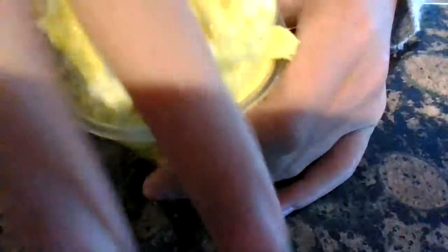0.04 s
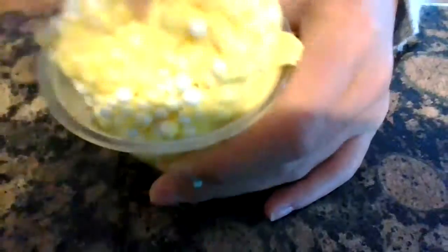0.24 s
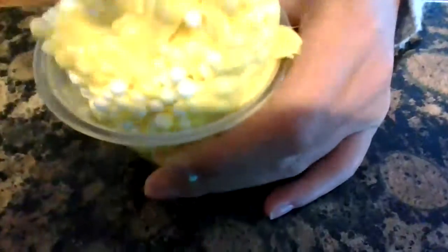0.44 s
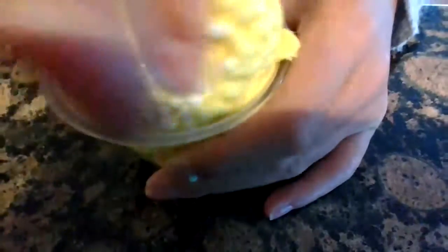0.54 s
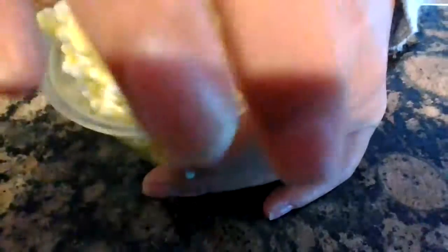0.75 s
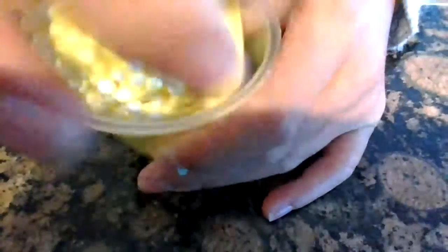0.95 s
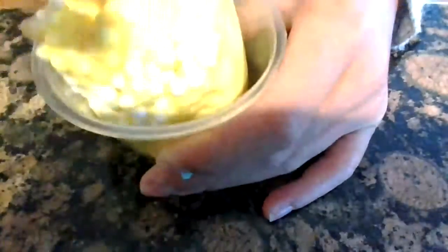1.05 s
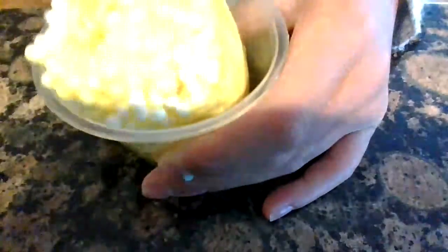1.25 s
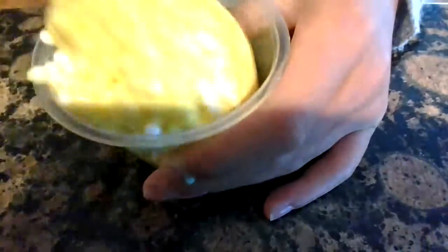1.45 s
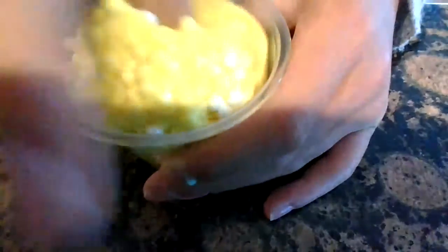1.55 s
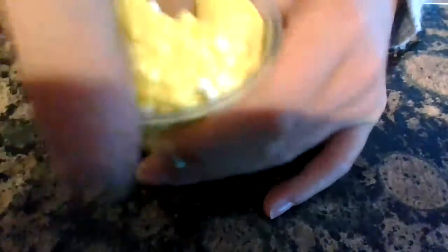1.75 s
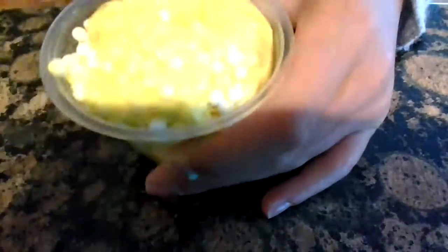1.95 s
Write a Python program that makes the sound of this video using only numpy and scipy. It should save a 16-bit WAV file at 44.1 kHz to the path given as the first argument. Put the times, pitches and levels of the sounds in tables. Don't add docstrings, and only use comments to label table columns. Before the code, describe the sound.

Foam-bead slime is squeezed in a plastic cup: soft wet fizz and bright ticks, then a sudden loud air-pocket pop that overloads the right side, followed by sparse crackles and duller pocks, close-miked in a quiet room.

```python
import sys
import numpy as np
from scipy import signal
from scipy.fft import rfft, irfft, next_fast_len
from scipy.io import wavfile
from scipy.ndimage import uniform_filter1d, map_coordinates

SR = 44100
rng = np.random.default_rng(int(sys.argv[2]) if len(sys.argv) > 2 else 0)


def inscribe(sig):
    pcm = np.round(np.clip(np.atleast_2d(sig).T, -1, 1) * 32767)
    wavfile.write(sys.argv[1], SR, pcm.astype(np.int16))


def to_linear_factor(level_db):
    exponent = np.asarray(level_db, float) / 20
    return 10 ** exponent


N = 88200

# (time [s], crack level [dB], cavity level [dB])
POCKET_TEARS = [
    (0.2467, 3.5, -3.5),
    (0.256, 3.5, -5.5),
]
# (time [s], length [s], hiss level [dB], dull body level [dB])
AIR_JETS = [
    (0.2424, 0.0035, -25.5, -40.5),
    (0.2453, 0.005, -26, -26.5),
    (0.251, 0.0032, -26.5, -30),
    (0.2551, .0112, -20, -24),
    (0.259, 0.01, -52.5, -35.5),
]
# (time [s], pressure [full scale])
PUFF_PUSH = [
    (.24, 0),
    (.2466, .16),
    (.24668, -1.02),
    (.2625, -1.02),
    (.2705, -.17),
    (.2795, -.07),
    (.285, .27),
    (.306, .6),
    (.335, .49),
]
# (time [s], peak [dB], pitch [Hz], left over right [dB])
BRIGHT_TICKS = [(0.0265, -22, 7780, -6), (0.0453, -29.5, 12600, -2), (0.0852, -21, 8200, -4),
                (0.1, -14.5, 7220, -6.5), (0.5294, -22, 14000, 2.5), (0.5502, -20.5, 11200, 2.5),
                (0.6485, -25, 6350, -3), (0.6613, -22.5, 8270, 4.5), (0.6882, -27, 13200, -2),
                (0.7136, -32, 8700, 3.5), (0.7848, -38.5, 6600, -4), (0.9105, -36.5, 7830, 1.5),
                (1.212, -31.5, 7470, -1.5), (1.2997, -30.5, 11400, -4), (1.3084, -28.5, 13400, 0),
                (1.3718, -34, 6240, -9), (1.4439, -27.5, 13600, -12), (1.6332, -26.5, 10440, -2.5),
                (1.7285, -37.5, 6450, -2), (1.7544, -35, 4680, -1), (1.774, -21, 7500, 0),
                (1.7847, -28.5, 4600, -3)]
# (time [s], peak [dB], pitch [Hz], left over right [dB])
MORE_TICKS = [(0.2458, -15, 6100, -8), (.6157, -45, 12600, -9), (0.6285, -40, 13100, 1),
              (.7384, -38, 12600, 0), (0.7705, -39, 13000, -3), (0.7929, -43, 8000, -2),
              (.8277, -37, 10900, 1), (.8945, -39, 6500, -2), (0.978, -39, 5150, 2),
              (0.995, -29.5, 6700, 5), (1.0066, -35.5, 6000, 5), (1.2192, -46, 11500, 0),
              (1.2443, -49, 7600, 0), (1.2635, -37, 12200, -6), (1.2812, -34.5, 13500, -3),
              (1.493, -36, 6300, 4), (1.754, -33, 9500, 0), (1.8043, -35, 7680, 0),
              (1.5485, -41, 10600, 0), (1.573, -45, 6540, 0), (1.6748, -45, 7000, 3),
              (0.9502, -32, 8200, -3)]
# (time [s], peak [dB], pitch [Hz], left over right [dB])
LARGE_POCKS = [(0.0772, -27.5, 3430, -8), (0.8811, -28.5, 2850, 2), (0.9488, -20, 2680, -2.5),
               (0.9778, -45, 2460, -6), (0.9953, -25.5, 3720, 4), (1.0072, -26, 2780, -1.5),
               (1.1223, -40.5, 1830, -4.5), (1.212, -21.5, 2800, -0.5), (1.3227, -36.5, 2950, -4),
               (1.372, -38.5, 1660, -3), (1.4706, -38.5, 3000, -16), (1.4925, -45, 2090, -5),
               (1.6581, -29, 2060, -5), (1.7844, -33, 950, -4.5)]
# (time [s], peak [dB], pitch [Hz], left over right [dB])
MORE_POCKS = [(.599, -46, 2000, -2), (.911, -31, 3420, -5), (.9282, -35, 3040, 0), (.9398, -33, 2500, 0),
              (.9615, -30.5, 1900, -3), (1.030, -32, 2880, 0), (1.15, -46, 3560, -8),
              (1.2388, -42, 3020, -4), (1.372, -31.5, 3150, -2), (1.5905, -40, 2610, -8),
              (1.583, -45, 1500, -4), (1.7602, -29, 3100, 1), (1.7865, -46, 1500, 0),
              (1.812, -35, 3000, -3)]
# (time [s], peak [dB], pitch [Hz], left over right [dB])
FOLLOW_UPS = [
    (.2165, -28.5, 1250, -3),
    (.2205, -30.5, 1900, -5),
    (.2605, -16.5, 2950, -17.5),
    (.5595, -21, 10500, 0),
    (.9595, -29, 2300, 3),
    (1.606, -48, 2000, -6),
]
# (time [s], length [s], level [dB], tilt toward the lows [dB])
SQUISHES = [(0, 0.066, -55.5, 11), (0.05, 0.097, -40.5, -4), (0.145, 0.067, -50, 0),
            (0.178, 0.056, -41.5, 0), (0.202, 0.044, -44, 7), (0.256, 0.13, -62, 13.5),
            (0.372, .11, -50, 4.5), (0.491, 0.024, -65, -5), (0.55, 0.035, -49, -11.5),
            (0.576, 0.18, -52.5, -6.5), (0.642, 0.027, -51, -6.5), (0.676, 0.046, -51.5, -4),
            (0.751, 0.041, -56.5, -1), (0.803, 0.14, -50, -3), (0.902, 0.19, -47.5, 0),
            (.944, 0.021, -51, 6), (1.132, 0.078, -55, 2), (1.188, 0.1, -67, -20), (1.245, 0.13, -57, -0.5),
            (1.333, 0.15, -53, -2), (1.439, 0.13, -52.5, 5), (1.533, 0.18, -62.5, 11.5),
            (1.715, 0.086, -50.5, 3.5), (1.748, 0.061, -41.5, 3), (1.78, 0.081, -48.5, -3),
            (1.95, 0.091, -56, -2.5)]
# (frequency [Hz], level [dB per Hz])
FIZZ_COLOUR = [(88, -40.5), (150, -7.5), (517, -13.5), (1410, -16), (4660, -8.5), (6770, -7), (7460, -8),
               (15100, -8), (16400, -16.5)]
# (frequency [Hz], width [Hz], level [dB])
CUP_AIR = [(575, 94, 3), (1250, 280, 4.5), (2000, 310, 6.5), (3380, 620, 3)]
# (time [s], length [s], level [dB], pitch [Hz])
CUP_RINGS = [
    (1.298, 0.019, -42, 455),
    (1.395, 0.011, -32.5, 465),
    (1.408, 0.013, -33, 470),
    (1.423, 0.017, -45.5, 516),
    (1.438, 0.012, -44, 505),
    (1.45, 0.01, -46, 470),
    (1.494, 0.0054, -44.5, 540),
]
# (frequency [Hz], level [dB])
CREAK_TONE = [(300, -27), (1100, -5.5), (1600, 0), (2100, -0.5), (2700, -9), (3300, -2.5), (4200, -22),
              (9000, -54)]
# (frequency [Hz], level [dB per Hz])
ROOM_COLOUR = [(12, -28), (20, 1), (147, -20), (272, -23.5), (322, -26.5), (438, -32.5), (580, -35),
               (15000, -52.5), (16400, -85.5)]
# (frequency [Hz], width [Hz], level [dB])
ROOM_HUMS = [(61.4, 8.8, 4.5), (197.4, 14, -2.5), (353, 13, -4.5), (445.4, 9.6, -6), (530, 120, -7)]
# (frequency [Hz], likeness [0 to 1])
LIKENESS = [(60, 0.95), (640, 0.77), (3100, 0.43), (15000, 0.56)]


def unit(x):
    return x / np.sqrt(np.mean(x ** 2) + 1e-20)


def along(points, hz):
    f, v = np.transpose(points)
    return np.interp(np.log(hz + 1), np.log(f + 1), v)


def wobble(rate):
    knots = rng.standard_normal(int(N * rate / SR) + 4)
    return map_coordinates(knots, [np.arange(N) * rate / SR])


def swell(s, length, edge):
    u = np.clip((np.arange(N) / SR - s) / length, 0, 1)
    return np.abs(np.sin(np.pi * u)) ** edge


def peaks(table, f):
    return sum(to_linear_factor(db) * w * w / ((f - c) ** 2 * 4 + w * w) for c, w, db in table)


def filtered(x, response):
    m = next_fast_len(N + SR // 2)
    return irfft(rfft(x, m) * response(np.fft.rfftfreq(m, 1 / SR)), m)[..., :N]


def spread(pair, gain):
    def turn(hz):
        return np.arccos(np.clip(along(LIKENESS, hz), -1, 1)) / 2

    mid, side = filtered(pair, lambda hz: gain(hz) * [np.cos(turn(hz)), np.sin(turn(hz))])
    return unit(np.array([mid + side, mid - side]))


def patchy(x):
    z = signal.stft(x, nperseg=256)[2]
    field = uniform_filter1d(rng.standard_normal(z.shape[1:]), size=12, axis=0)
    field = uniform_filter1d(field, size=8, axis=1)
    return signal.istft(z * to_linear_factor(3 * unit(field)), nperseg=256)[1][:, :N]


def add(out, s, x):
    part = out[..., round(s * SR):][..., :x.shape[-1]]
    part += x[..., :part.shape[-1]]


def tearing_pocket():
    cavity_hz, lift_hz, sag_s = 500, 2190, .0029
    swell_s, cavity_t60_s, crack_t60_s = 0.0029, 0.025, 0.0024
    out, t = np.zeros((2, N)), np.arange(SR // 10) / SR
    for s, crack_db, cavity_db in POCKET_TEARS:
        phase = 2 * np.pi * np.cumsum(cavity_hz + lift_hz * np.exp(-(t / sag_s) ** 2)) / SR
        rise = 1 - np.exp(-(t / swell_s) ** 3)
        tone = to_linear_factor(cavity_db + 7.5 - 60 * t / cavity_t60_s) * rise * np.sin(phase)
        noise = rng.standard_normal(len(t)) + 0.8 * np.sin(2 * np.pi * 1100 * t)
        crack = to_linear_factor(crack_db - 60 * t / crack_t60_s) * noise
        add(out, s, tone * [[1], [.1]] + crack * [[1], [.4]])
    return out


def escaping_air():
    noise = filtered(rng.standard_normal((3, N)), lambda hz: 1 / (1 + (hz / 12000) ** 4))
    hiss_level = sum(to_linear_factor(db) * swell(s, length, .6) for s, length, db, _ in AIR_JETS)
    hiss = hiss_level * (noise[0] + 0.92 * noise[1:])
    body = unit(filtered(rng.standard_normal(N), lambda hz: (hz > 150) / (1 + (hz / 1500) ** 2)))
    body_level = sum(to_linear_factor(db) * swell(s, length, 0.69) for s, length, _, db in AIR_JETS)
    return hiss + body_level * body * [[1], [.3]]


def puff_on_port():
    settle_s, end_s, flutter_db, flutter_t60_s = .09, .47, -27, 0.89
    out, t = np.zeros((2, N)), np.arange(SR // 10) / SR
    click = np.exp(-(t / 0.00011) ** 2) * (0.41 + 0.74 * np.cos(2 * np.pi * 9000 * t))
    add(out[1], .2559, to_linear_factor(9) * click)
    time, (s, push) = np.arange(N) / SR, np.transpose(PUFF_PUSH)
    rest = np.exp(-(end_s - s[-1]) / settle_s)
    decay = np.exp(-np.clip(time - s[-1], 0, 9) / settle_s)
    settle = np.clip((decay - rest) / (1 - rest), -.03, 1)
    swing = np.interp(time, s, push) * settle * np.exp(-np.clip(time - end_s, 0, 9) / 0.49)
    smooth = uniform_filter1d(swing, size=101)
    out[1] += np.where(time > .264, smooth, swing)
    fade = to_linear_factor(flutter_db - 60 * (time - s[3]) / flutter_t60_s) * np.clip((time - s[4]) / 0.022, 0, 1)
    flutter = fade * np.array([wobble(67.0), wobble(128.9)])
    return out + uniform_filter1d(flutter, size=101)


def bubbles(rows, cycles, span, reach, wet_db):
    snap_db, snap_t60_s, splash_db, splash_t60_s = -13.5, 0.0056, -15, 0.016
    out, t = np.zeros((2, N)), np.arange(SR // 25) / SR
    rise = 1 - np.exp(-(t / 0.00029) ** 2)
    for s, db, hz, pan_db in rows:
        ring = np.sin(2 * np.pi * hz * t)
        ring += .5 * np.sin(2 * np.pi * hz * 1.49 * t)
        ring += .3 * np.sin(2 * np.pi * hz * 0.541 * t)
        ring *= to_linear_factor(-60 * t * hz / cycles)
        noise = rng.standard_normal((3, len(t)))
        edges = [hz / span, min(hz * reach, SR / 2.2)]
        band = signal.butter(1, edges, "band", fs=SR)
        noise = unit(signal.lfilter(*band, noise[0] + .5 * noise[1:]))
        fade = to_linear_factor(snap_db - 60 * t / snap_t60_s) + to_linear_factor(splash_db - 60 * t / splash_t60_s)
        pop = (ring + to_linear_factor(wet_db) * noise * fade) * rise * np.exp(1)
        sides = to_linear_factor(db - 4.5 + np.array([[pan_db], [-pan_db]]) / 2)
        add(out, s + .0007, sides * pop)
    return out


def fizz():
    grains_per_s, grain_spread_db, grain_share, rest_db = 3500, 3, 0.49, -69
    hits = rng.random((2, N)) < grains_per_s / SR
    grains = hits * to_linear_factor(grain_spread_db * np.minimum(rng.exponential(size=(2, N)), 3))
    grains = signal.lfilter([1], [1, -.93], grains) * rng.standard_normal((2, N))
    mix = grain_share * unit(grains) + (1 - grain_share) * rng.standard_normal((2, N))
    raw = spread(patchy(mix), lambda hz: to_linear_factor(along(FIZZ_COLOUR, hz)) * (1 + peaks(CUP_AIR, hz)))
    low = filtered(raw, lambda hz: 1 / (1 + (hz / 3800) ** 4))
    high_gain, low_gain = to_linear_factor(rest_db), to_linear_factor(rest_db)
    for s, length, db, tilt_db in SQUISHES:
        press = swell(s, length, 1)
        high_gain = high_gain + to_linear_factor(db) * press
        low_gain = low_gain + to_linear_factor(db + tilt_db) * press
    return to_linear_factor(1.8 * wobble(59.9)) * ((raw - low) * high_gain + low * low_gain)


def cup():
    out = np.zeros(N)
    for s, length, db, hz in CUP_RINGS:
        t = np.arange(int(length * SR)) / SR
        glide = 1 + 0.37 * (t / length - 1) / 2
        add(out, s, to_linear_factor(db) * np.sin(np.pi * t / length) * np.sin(2 * np.pi * hz * t * glide))
    out *= 1 + .18 * wobble(250)
    creak_s, creak_len_s, start_hz, end_hz, creak_db = 1.398, 0.033, 576, 445, -48.5
    u = np.clip((np.arange(N) / SR - creak_s) / creak_len_s, 0, 1)
    turns = np.cumsum(start_hz + (end_hz - start_hz) * u + 22 * wobble(300)) / SR
    slips = np.diff(np.floor(turns), prepend=0)
    slips = unit(filtered(slips, lambda hz: to_linear_factor(along(CREAK_TONE, hz))))
    return out + to_linear_factor(creak_db) * slips * np.sin(np.pi * u ** 0.52) ** 0.66


def room():
    floor = spread(rng.standard_normal((2, N)), lambda hz: to_linear_factor(along(ROOM_COLOUR, hz)) * (hz > 18))
    floor = to_linear_factor(-53.5 + wobble(10.0)) * floor
    hum = to_linear_factor(-65) * spread(rng.standard_normal((2, N)), lambda hz: peaks(ROOM_HUMS, hz))
    motor = np.sin(2 * np.pi * 441 * np.arange(N) / SR + wobble(7.6))
    motor = to_linear_factor(-66.5 + wobble(8.9)) * motor
    sway = to_linear_factor(-54.5) * np.array([wobble(9.03), wobble(9.03)])
    return floor + hum + motor + sway


def scene():
    burst = tearing_pocket() + escaping_air() + puff_on_port()
    bright = bubbles([*BRIGHT_TICKS, *MORE_TICKS], 24.6, span=1.67, reach=1.42, wet_db=-2)
    dull = bubbles([*LARGE_POCKS, *MORE_POCKS], 8.9, span=2.4, reach=2.1, wet_db=-8)
    after = bubbles(FOLLOW_UPS, 16.1, span=1.3, reach=7.6, wet_db=-3)
    return burst + bright + dull + after + fizz() + cup() + room()


def band_limit(x):
    return signal.sosfilt(signal.butter(12, 16520, fs=SR, output="sos"), x)


def record(dry):
    top_hz, top_soft_hz = 15900, 132.8

    def phone(hz):
        shadow = 1 - 0.53 * peaks([(4043, 506, 0)], hz)
        return shadow / (1 + np.exp(np.clip((hz - top_hz) / top_soft_hz, -50, 50)))

    mix = np.clip(filtered(dry, phone), -1, 1)
    return band_limit(mix)


dry = scene()
out = record(dry)
inscribe(out)
```